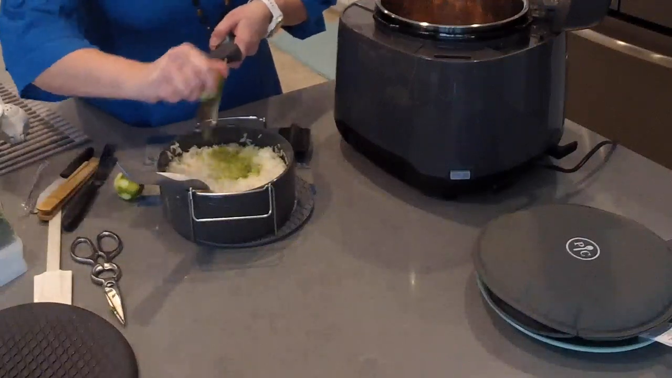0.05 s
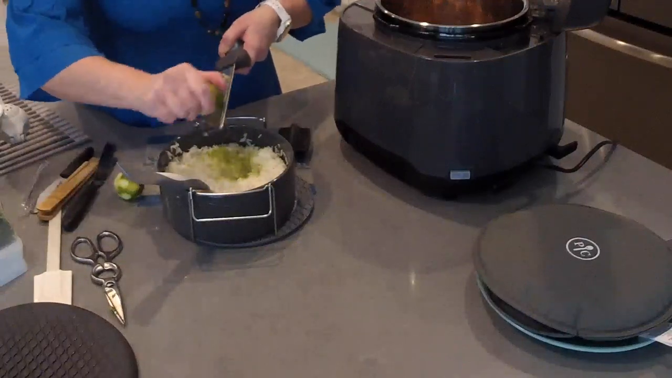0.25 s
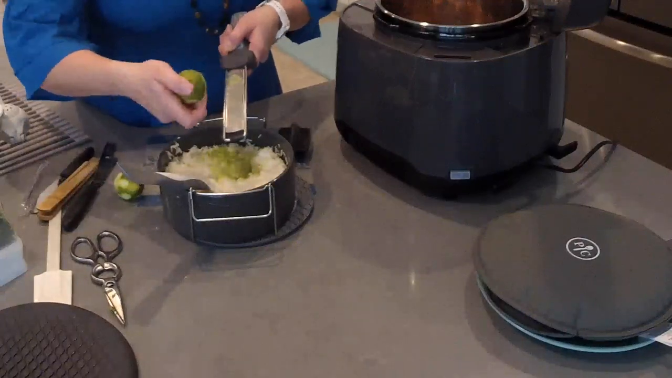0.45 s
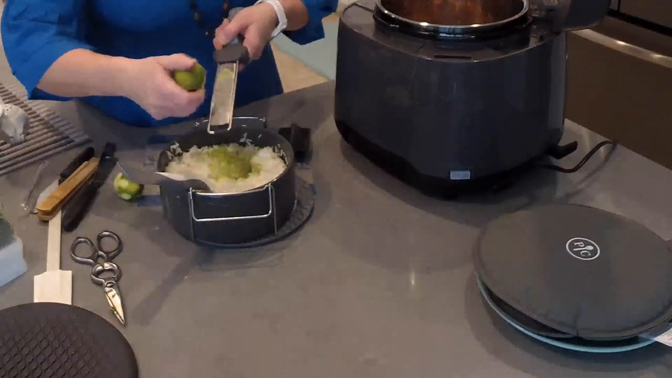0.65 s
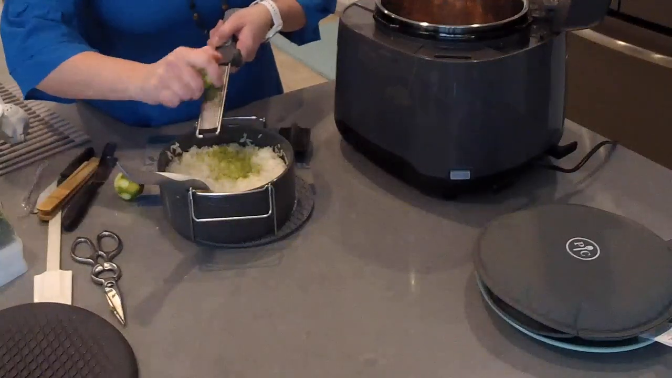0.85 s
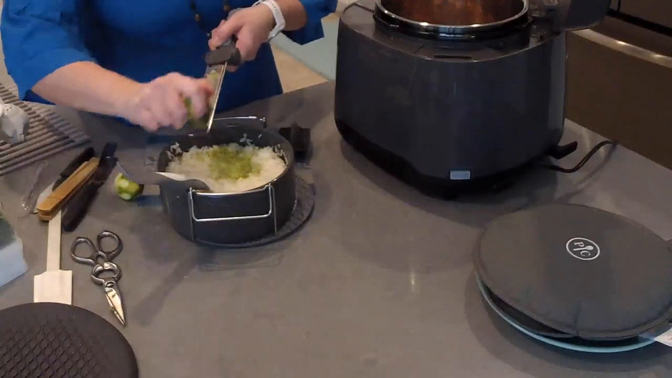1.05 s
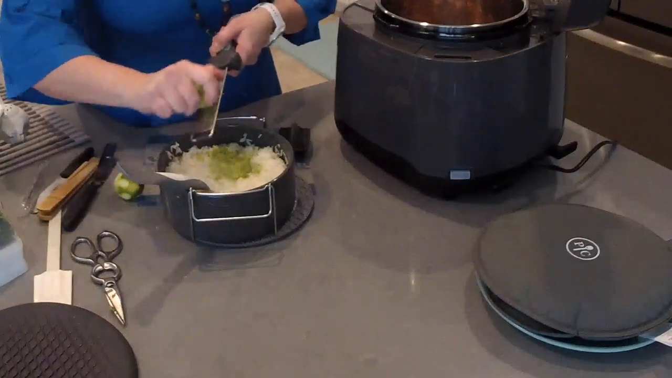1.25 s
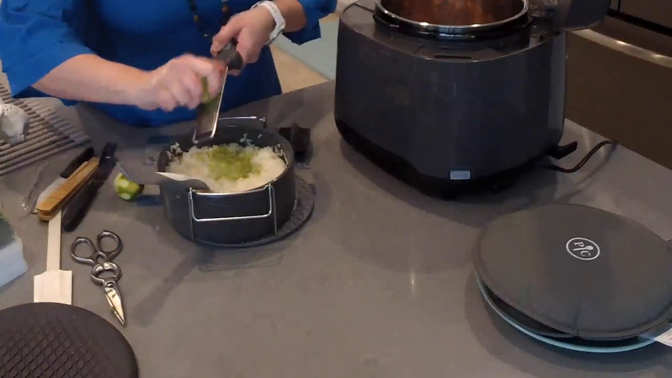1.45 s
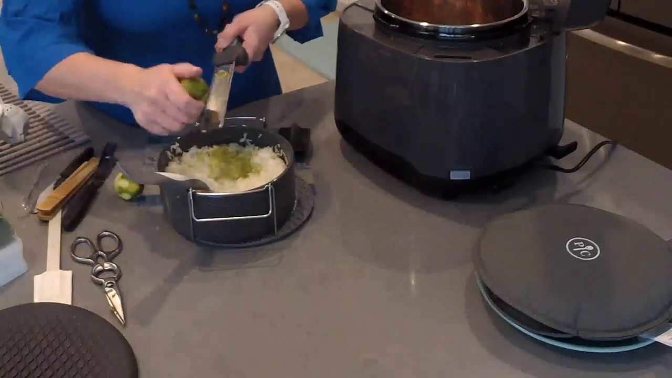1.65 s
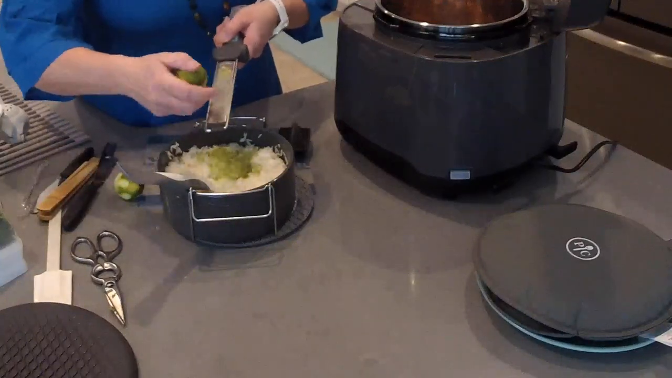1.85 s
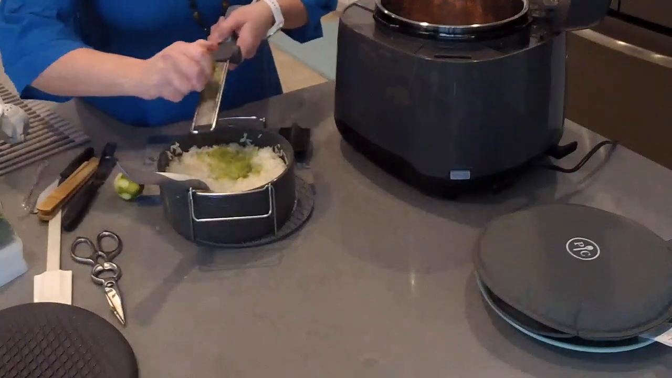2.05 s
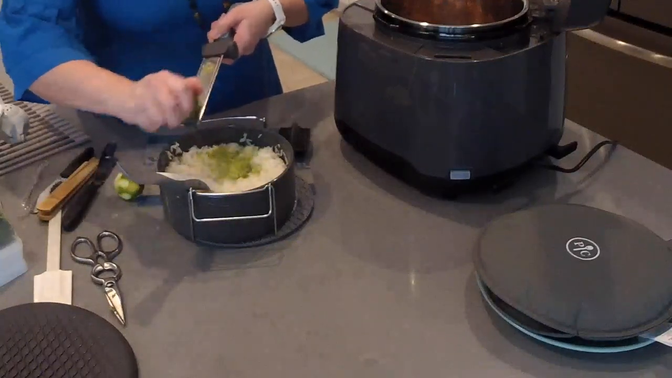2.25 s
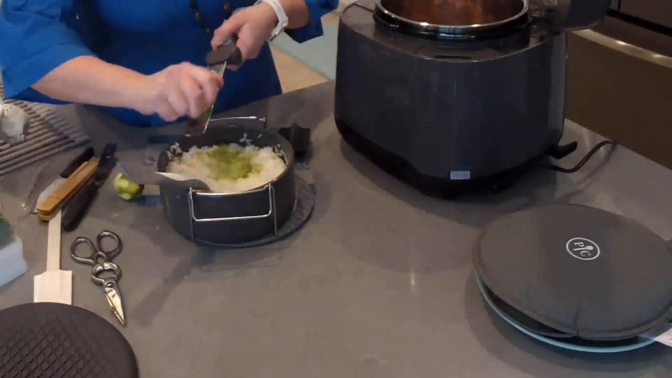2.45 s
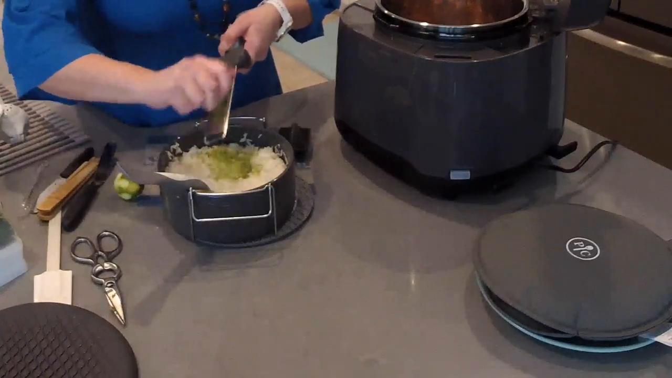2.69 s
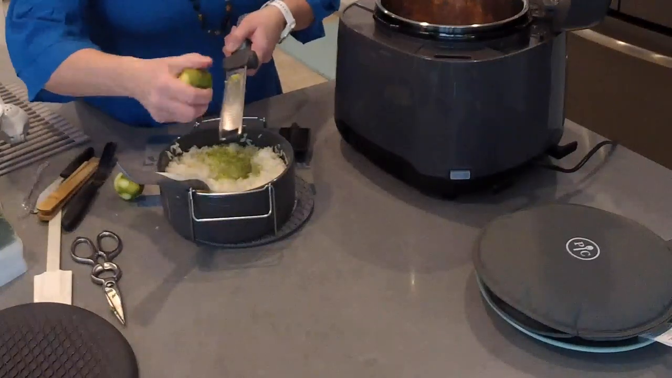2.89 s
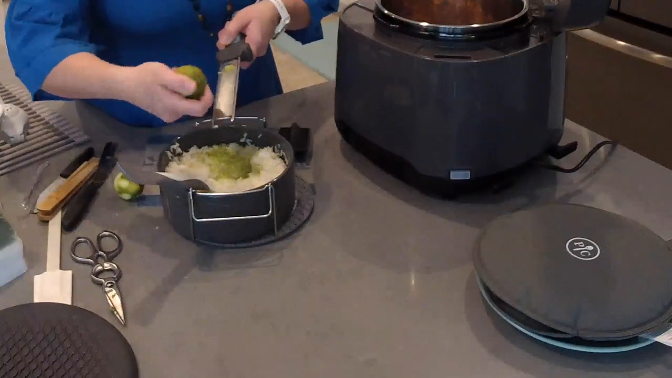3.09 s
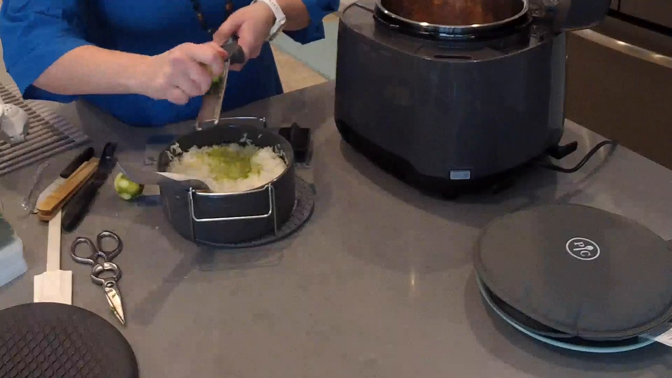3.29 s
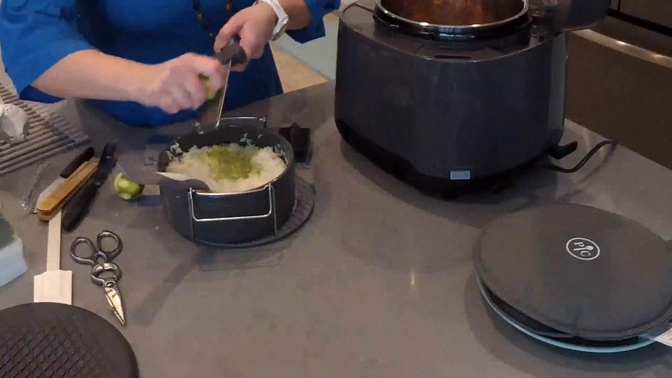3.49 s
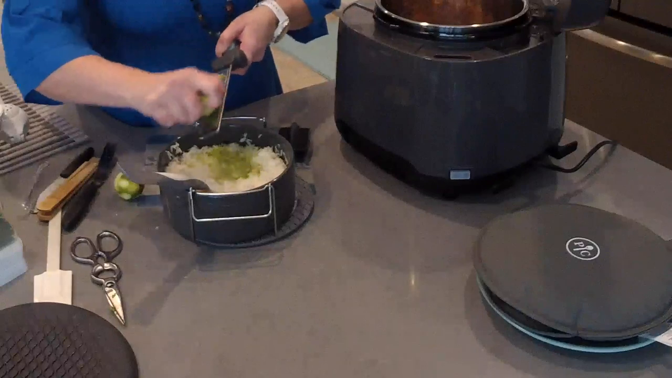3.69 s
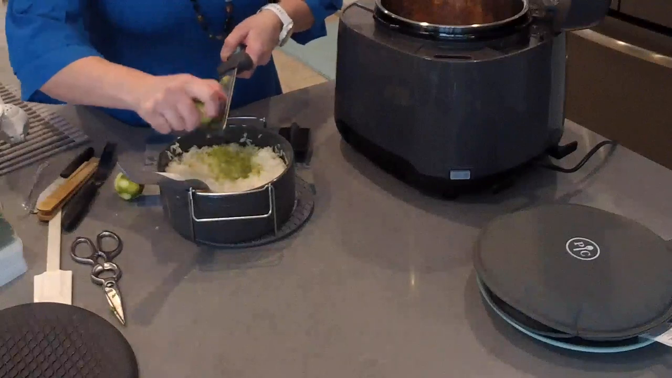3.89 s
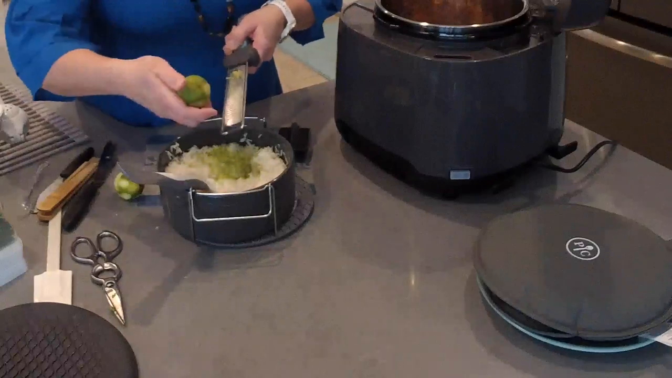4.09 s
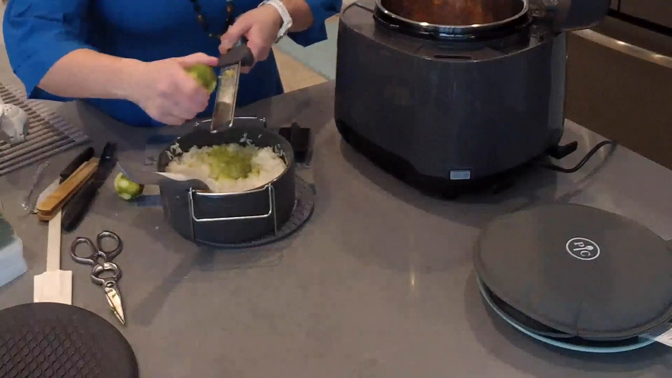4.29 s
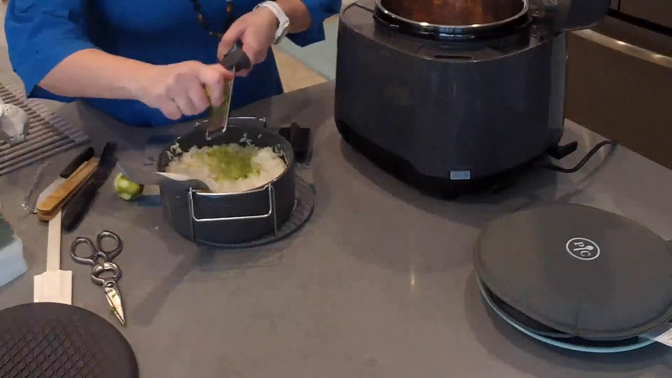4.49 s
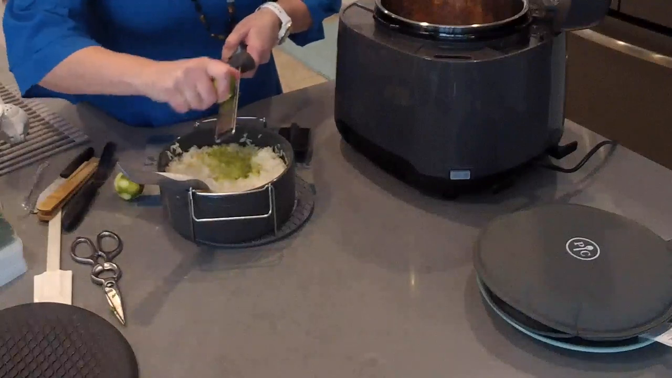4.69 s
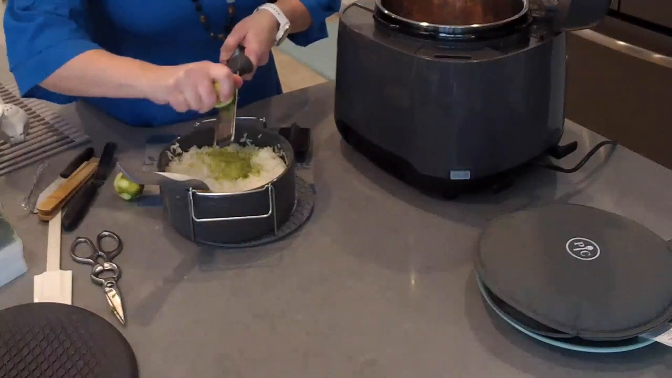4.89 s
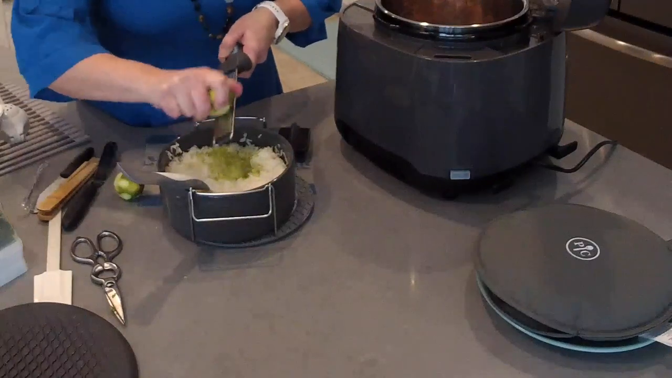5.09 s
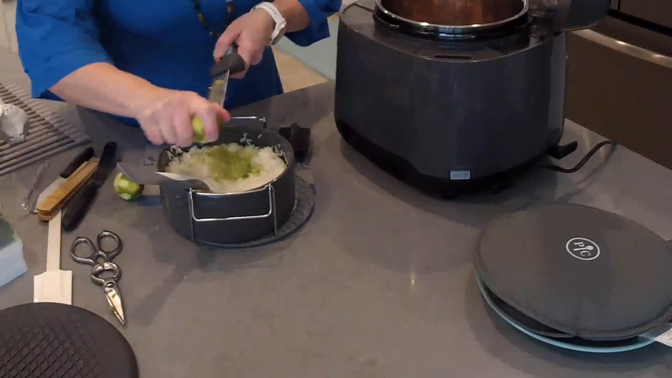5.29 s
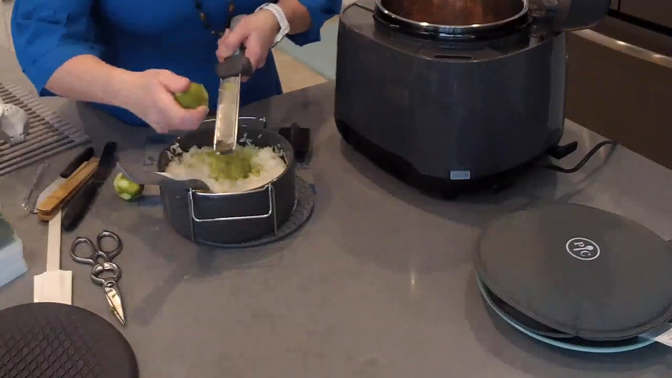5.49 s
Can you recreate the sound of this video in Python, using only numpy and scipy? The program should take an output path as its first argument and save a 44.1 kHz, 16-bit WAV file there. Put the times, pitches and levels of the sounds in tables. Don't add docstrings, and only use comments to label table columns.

```python
import sys
import numpy as np
from scipy import signal
from scipy.fft import rfft, irfft, next_fast_len
from scipy.io import wavfile

SR = 44100
rng = np.random.default_rng(int(sys.argv[2]) if len(sys.argv) > 2 else 0)


def master_out(mix):
    frames = np.transpose(np.atleast_2d(mix))
    ceiling = np.clip(frames, -1, 1)
    pcm = np.round(ceiling * 32767).astype(np.int16)
    wavfile.write(sys.argv[1], SR, pcm)


def volts_from_decibels(level):
    exponent = np.asarray(level, float) / 20
    return 10 ** exponent


N = 244314
LEFT_RIGHT = np.array([[1], [-1]])


def zester():
    # pitch_hz, level_db
    snap_colour = [(4500, -12), (5800, -34), (6700, -0.5), (8300, 1), (9400, -6), (11000, -5.5),
                   (12500, -10.5), (15000, -12)]
    # pitch_hz, level_db
    scrape_colour = [(2300, 2.5), (3000, -1), (3500, 5), (3900, -9.5), (4600, 9), (6000, 5.5)]
    # pitch_hz, level_db
    rub_colour = [(450, -11.5), (700, 4), (1000, -8), (1300, 0.5), (1700, -1.5), (2100, 7)]
    contact_db, body_lag_s = -80, .005
    press_db, dull_db = pressure()
    late_db = np.interp(np.arange(N) - body_lag_s * SR, np.arange(N), press_db)
    body_db = dull_db + np.minimum(late_db - contact_db, 0)
    swing_db = np.maximum(late_db, contact_db) + 61.5
    grip = volts_from_decibels(1.5 * drift(60) + 1.5 * drift(250))

    snaps = tears(snap_colour, per_s=30000, spread_db=2.0, cycles=19.5, patchy_db=0.0, count=16)
    scrape = tears(scrape_colour, per_s=9000, spread_db=1.5, cycles=4.5, patchy_db=-1.0, count=10)
    rub = tears(rub_colour, per_s=5000, spread_db=0.0, cycles=9.5, patchy_db=3.5, count=10)
    snaps = volts_from_decibels(press_db + 8.0) * snaps
    scrape = volts_from_decibels(-58 + 0.51 * swing_db + body_db) * scrape
    rub = volts_from_decibels(-63 + 0.74 * swing_db + body_db) * rub
    return grip * (snaps + scrape + rub)


def pressure():
    # touch_s, time_to_bite_s, cut_length_s, bite_db, sag_over_cut_db
    cuts = [(0.103, .031, 0.057, -56.5, 6.5), (0.904, 0.031, 0.06, -63, -0.5),
            (1.176, 0.0091, 0.061, -63, 6), (1.393, 0.034, 0.067, -54.5, 8), (2.101, 0.019, 0.068, -65, 0),
            (2.355, 0.022, 0.06, -58.5, 6), (2.605, 0.02, 0.079, -55, 7), (3.294, 0.022, 0.064, -59.5, 0.5),
            (3.524, 0.016, 0.05, -57, 2), (3.745, 0.032, 0.06, -52.5, 17.5),
            (4.423, .006, 0.025, -68.5, -1), (4.469, .006, 0.054, -59.5, 12.5),
            (4.67, 0.016, 0.059, -57.5, 8), (4.896, 0.021, 0.071, -59, 6), (5.13, 0.026, 0.059, -59, 3)]
    # start_s, length_s, peak_db, dullness_db
    returns = [(0.0, 0.081, -69, -2.5), (1.034, 0.097, -68.5, -5), (1.156, 0.014, -70, -5),
               (1.288, 0.083, -71.5, -10), (1.488, 0.076, -73.5, -4), (2.247, 0.067, -67.5, -6),
               (2.483, 0.098, -71, -5), (3.412, 0.091, -71.5, -9), (3.635, .09, -67.5, -4),
               (3.966, 0.17, -85, 6.5), (4.556, 0.092, -71.5, -17), (4.774, 0.096, -71.5, -8),
               (5.014, 0.094, -73, -7)]
    touch_s, touch_db = .005, -16
    jolt_s, jolt_db = 0.0014, 2.5
    lift_s, lift_db = .011, -11
    trail_s, trail_db_per_s = .3, 170
    apart_db = -60
    arch_db, arch_top = 13, .55
    t = np.arange(N) / SR
    strokes, dull_db = [], np.zeros(N)
    for start_s, bite_s, cut_s, bite_db, sag_db in cuts:
        press_s = max(bite_s - jolt_s, touch_s / 10)
        steps_s = [start_s - touch_s, touch_s, press_s, jolt_s, cut_s, lift_s, trail_s]
        steps_db = [apart_db, touch_db - apart_db, -touch_db - jolt_db, jolt_db,
                    -sag_db, lift_db, -trail_s * trail_db_per_s]
        strokes.append(np.interp(t, np.cumsum(steps_s), bite_db + np.cumsum(steps_db)))
    for start_s, length_s, peak_db, extra_db in returns:
        along = (t - start_s) / length_s - arch_top
        from_top = np.where(along < 0, -along / arch_top, along / (1 - arch_top))
        from_top = np.minimum(from_top, 10)
        strokes.append(peak_db - arch_db * from_top ** 2)
        dull_db += extra_db * np.clip(1 - from_top ** 2, 0, 1)
    return np.max(strokes, axis=0), dull_db


def tears(colour, per_s, spread_db, cycles, patchy_db, count):
    sizes = volts_from_decibels(spread_db * np.minimum(rng.exponential(1, N), 4)) * rng.choice([-1, 1], N)
    snaps = sizes * (rng.random(N) < per_s / SR) + 1e-18
    patch_of_snap = rng.integers(0, count, N)
    out = np.zeros(N)
    for patch, hz in enumerate(np.geomspace(colour[0][0], colour[-1][0], count)):
        ringing = rms_one(resonance(snaps * (patch_of_snap == patch), hz, hz / cycles))
        level = volts_from_decibels(at_hz(colour, hz) + patchy_db * drift(14.6))
        out += level * np.sqrt(hz) * ringing
    return rms_one(out)


def ticks():
    # start_s, peak_db, pitch_hz
    knocks = [
        (0.7342, -59, 5670),
        (3.0385, -79, 2560),
    ]
    out = np.zeros(N)
    t = np.arange(SR // 20) / SR
    for start_s, peak_db, hz in knocks:
        ring = volts_from_decibels(peak_db + 2 - 60 * t / .018) * np.sin(2 * np.pi * hz * t)
        out[round(start_s * SR):][:len(t)] += ring
    return out


def nearby(x):
    lags_s = rng.uniform(.0006, .006, (10, 2, 1))
    signs = rng.choice([-1, 1], (10, 2, 1))
    return through(x, lambda hz: np.sum(signs * np.exp(-2j * np.pi * hz * lags_s), axis=0) / np.sqrt(10))


def kitchen(x):
    lags_s = rng.uniform(.006, .03, (6, 2, 1))

    def echoes(hz):
        t60_s = .33 * (hz / 3000 + 0.21) ** -.25
        loops = [volts_from_decibels(-60 * lag / t60_s) * np.exp(-2j * np.pi * hz * lag) for lag in lags_s]
        return sum(loop / (1 - loop) for loop in loops) / 2
    return through(x, echoes)


def hum():
    tonal = steady_tones() + fan_blade() + fan_booms()
    return volts_from_decibels(0.16 * LEFT_RIGHT) * (fan_rumble() + volts_from_decibels(0.54 * LEFT_RIGHT) * tonal)


def steady_tones():
    # pitch_hz, level_db (rms), wobble_db
    steady = [(49.17, -57.5, 1.5), (119.7, -64.5, 1), (240.8, -70, 5), (383.5, -71, -0.5)]
    t = np.arange(N) / SR
    out = 0
    for hz, level_db, wobble_db in steady:
        phase = 2 * np.pi * (hz * t + rng.random()) + .12 * LEFT_RIGHT
        out = out + volts_from_decibels(level_db + wobble_db * drift(5.8)) * np.sqrt(2) * np.sin(phase)
    return out


def fan_blade():
    # time_s, level_db (rms)
    swells = [(0.0, -74), (0.49, -67.5), (0.52, -65.5), (1.64, -73.5), (1.71, -68.5), (2.08, -72),
              (2.87, -72.5), (2.92, -63), (3.49, -67), (3.5, -79.5), (4.24, -66), (4.7, -73), (5.29, -76),
              (5.54, -60.5)]
    turns = np.cumsum(254.7 + 3.694 * drift(6.5)) / SR
    level_db = np.interp(np.arange(N) / SR, *np.transpose(swells)) + 2.0 + drift(4.4)
    return volts_from_decibels(level_db) * np.sqrt(2) * np.sin(2 * np.pi * turns + 0.17 * LEFT_RIGHT)


def fan_booms():
    # pitch_hz, width_hz, level_db
    modes = [(61.4, 7.8, -67.5), (90.3, 8, -67.5), (152, 13, -73), (292.4, 3.3, -85.5), (364.5, 5.6, -81)]
    out = np.zeros(N)
    for hz, width_hz, level_db in modes:
        once = resonance(rng.standard_normal(N), hz, width_hz)
        out += volts_from_decibels(level_db) * rms_one(resonance(once, hz, width_hz))
    return out


def fan_rumble():
    # pitch_hz, level_db (per Hz)
    colour = [(6, 3.5), (14, 3), (30, -5), (70, -14.5), (170, -13.5), (280, -20), (500, -24.5), (900, -30),
              (1500, -30.5), (2500, -32.5), (5000, -41.5)]
    # pitch_hz, left_right_likeness (0 to 1)
    likeness = [(20, .93), (60, 1), (290, 0.97), (640, 0.88), (1400, 0.78)]

    def shared(hz):
        return np.clip(at_hz(likeness, hz), 0, 1)
    mid, side = rng.standard_normal((2, N))
    mid = through(mid, lambda hz: volts_from_decibels(at_hz(colour, hz)) * np.sqrt(1 + shared(hz)))
    side = through(side, lambda hz: volts_from_decibels(at_hz(colour, hz)) * np.sqrt(1 - shared(hz)))
    return volts_from_decibels(-55) * rms_one(mid + side * LEFT_RIGHT)


def rms_one(x):
    return x / np.sqrt(np.mean(x ** 2) + 1e-20)


def at_hz(points, hz):
    table_hz, value = np.array(points).T
    return np.interp(np.log(hz), np.log(table_hz), value)


def drift(rate):
    r = np.exp(-80 * np.pi * rate / SR)
    slow = signal.lfilter([1], [1, -2 * r, r * r], rng.standard_normal(N // 40 + 2002))[2000:]
    return np.interp(np.arange(N) / 40, np.arange(len(slow)), rms_one(slow))


def resonance(x, hz, width):
    r = np.exp(-np.pi * width / SR)
    poles = [1, -2 * r * np.cos(2 * np.pi * hz / SR), r * r]
    return signal.lfilter([(1 - r * r) / 2, 0, (r * r - 1) / 2], poles, x)


def through(x, response):
    size = next_fast_len(N + SR // 2)
    hz = np.arange(size // 2 + 1) * SR / size + 1e-3
    return irfft(rfft(x, size) * response(hz), size)[..., :N]


def scene():
    def from_left(hz):
        louder = volts_from_decibels(LEFT_RIGHT * 1.7 * np.clip(hz / 8000, 0, 1) ** 2)
        earlier = np.exp(2j * np.pi * hz * LEFT_RIGHT * 3e-6)
        return louder * earlier
    hand = zester() + ticks()
    direct = through(hand, from_left)
    left, right = volts_from_decibels(-8.5) * nearby(hand) + volts_from_decibels(-7) * kitchen(hand)
    apart = through(left - right, lambda hz: 1.26 / (1 + (5200 / hz) ** 4))
    reflected = (left + right + LEFT_RIGHT * apart) / 2
    return direct + reflected + hum()


def roll_off(x):
    return signal.sosfilt(signal.butter(12, 15620, fs=SR, output="sos"), x)


def record(dry):
    # pitch_hz, level_db (per Hz)
    hiss_colour = [(1500, -3.5), (3300, -4), (5700, 0.5), (8000, -4), (10500, -2.5), (13000, -9),
                   (15500, -10)]
    offset = [
        [-.0080],
        [-.0165],
    ]
    copies, copy_step_s, top_hz = 4, 1 / 9600, 15520

    def comb(hz):
        summed = sum(np.exp(-2j * np.pi * hz * k * copy_step_s) for k in range(copies))
        return (hz < top_hz) * summed / copies
    hiss = through(rng.standard_normal((2, N)), lambda hz: volts_from_decibels(-68 + at_hz(hiss_colour, hz)))
    return roll_off(through(dry + hiss, comb) + offset)


dry = scene()
out = record(dry)
master_out(out)
```